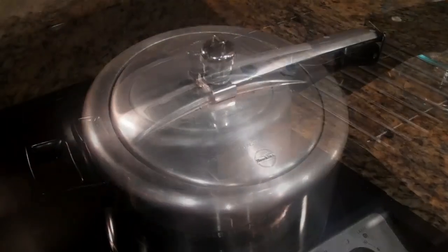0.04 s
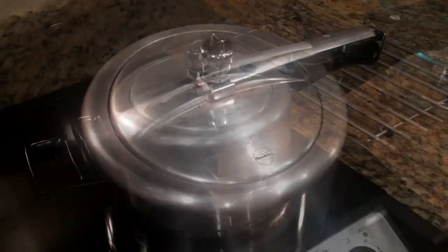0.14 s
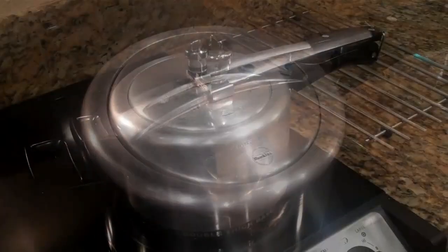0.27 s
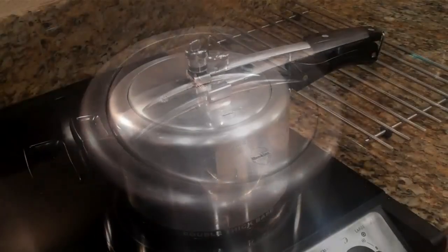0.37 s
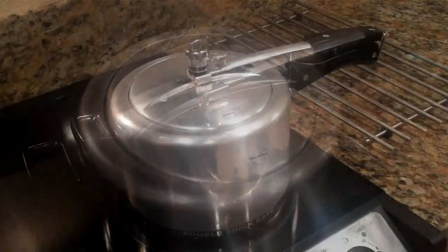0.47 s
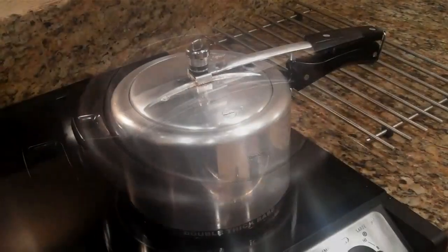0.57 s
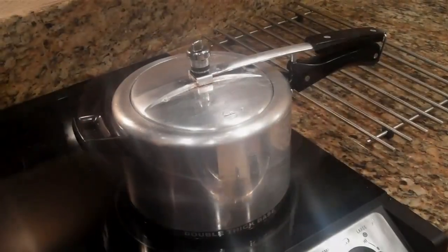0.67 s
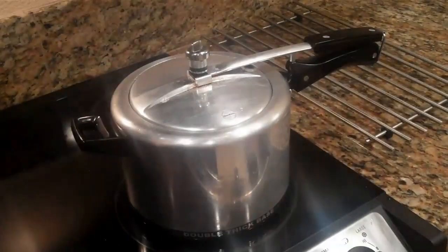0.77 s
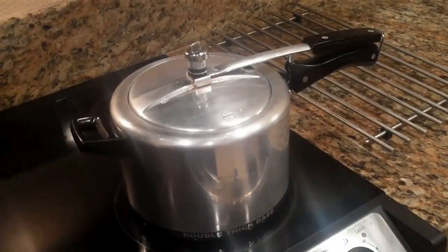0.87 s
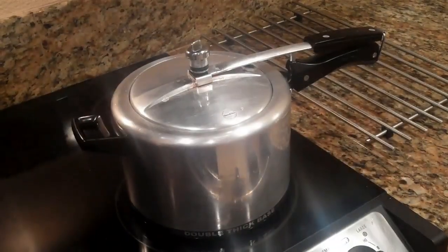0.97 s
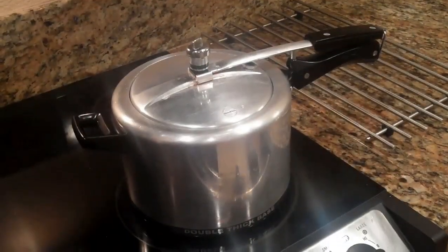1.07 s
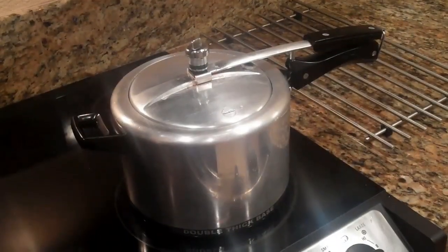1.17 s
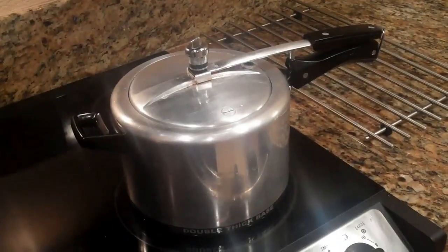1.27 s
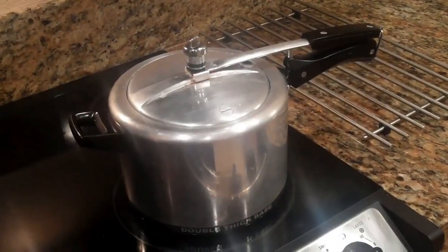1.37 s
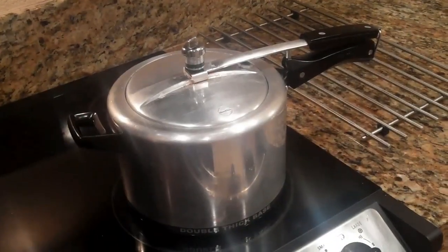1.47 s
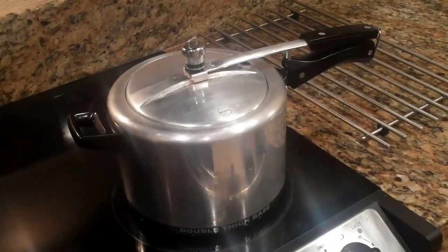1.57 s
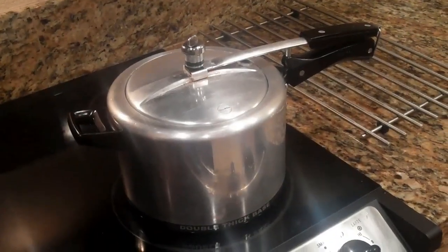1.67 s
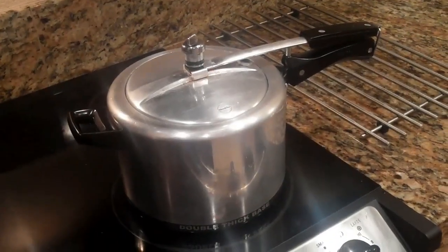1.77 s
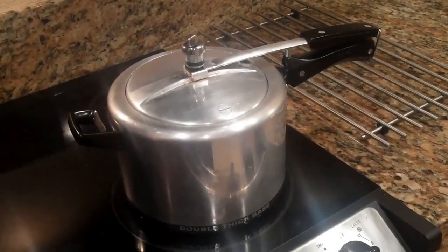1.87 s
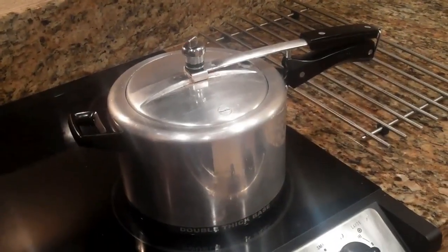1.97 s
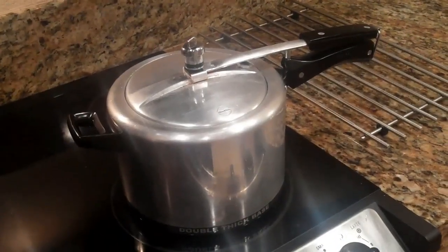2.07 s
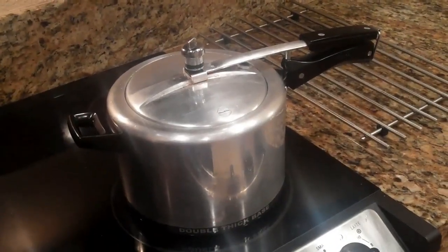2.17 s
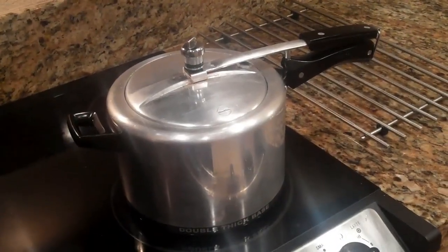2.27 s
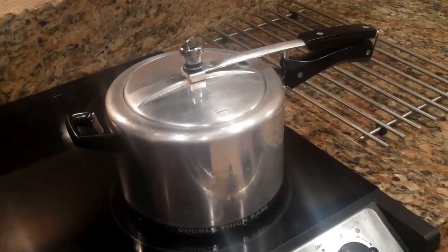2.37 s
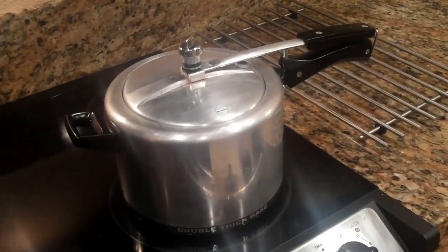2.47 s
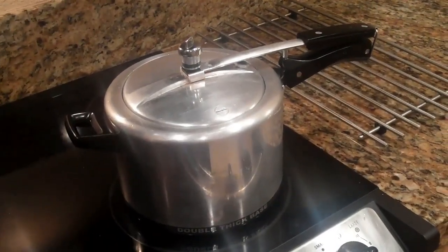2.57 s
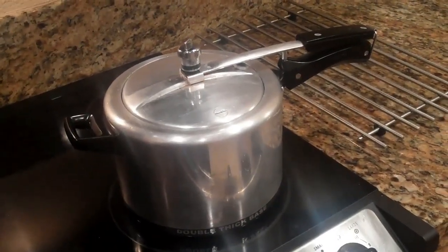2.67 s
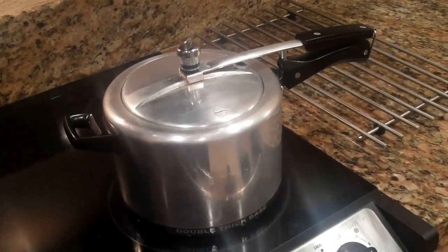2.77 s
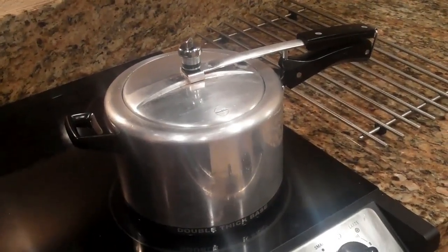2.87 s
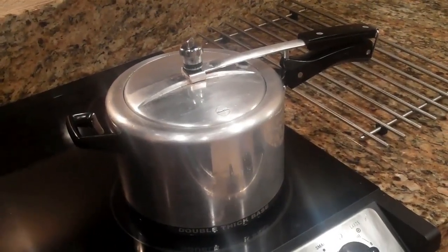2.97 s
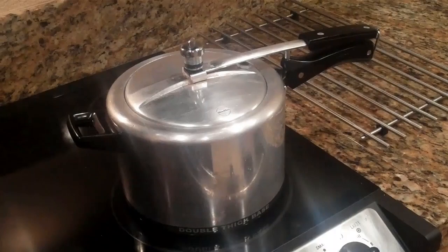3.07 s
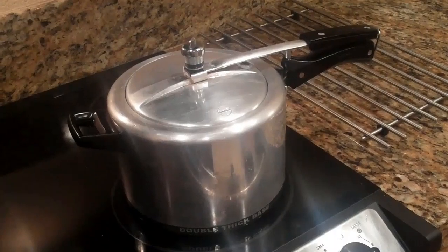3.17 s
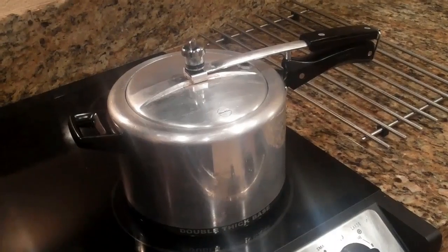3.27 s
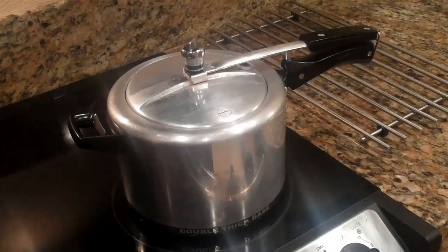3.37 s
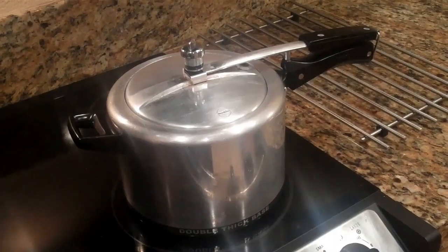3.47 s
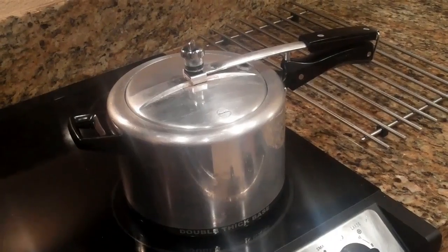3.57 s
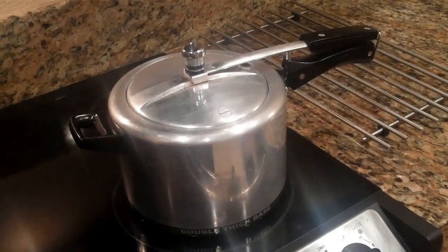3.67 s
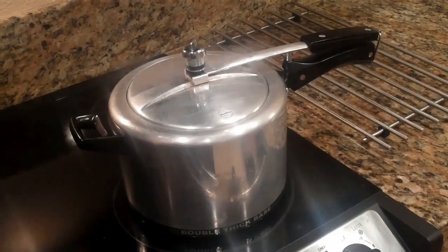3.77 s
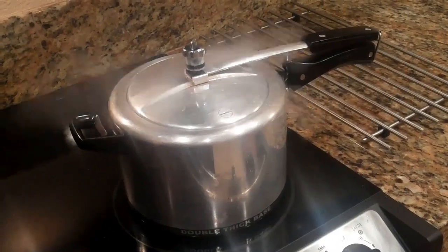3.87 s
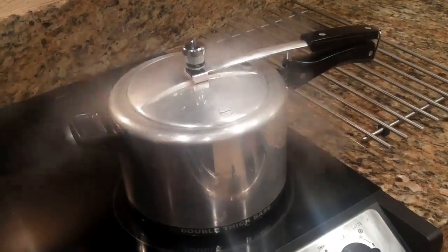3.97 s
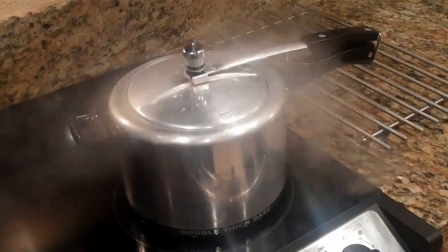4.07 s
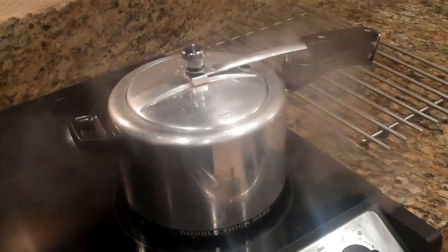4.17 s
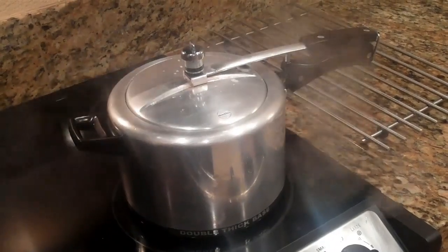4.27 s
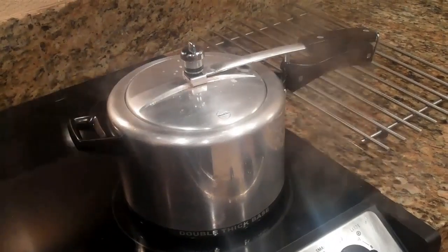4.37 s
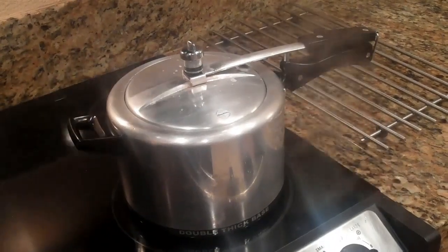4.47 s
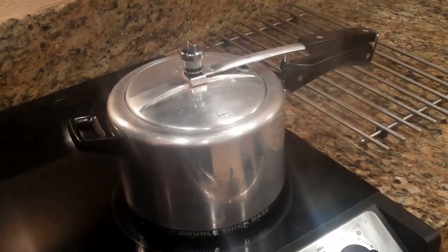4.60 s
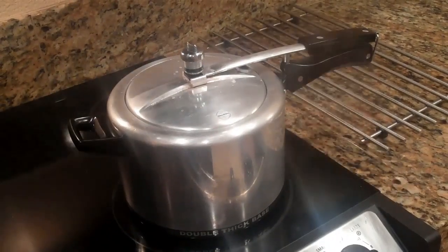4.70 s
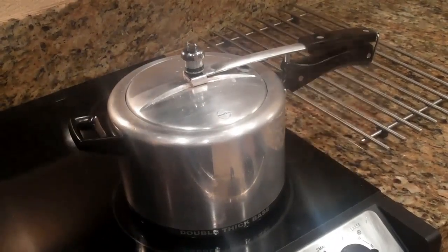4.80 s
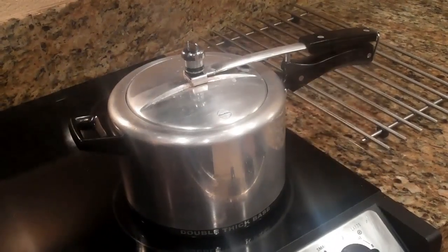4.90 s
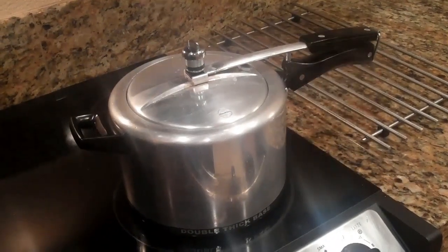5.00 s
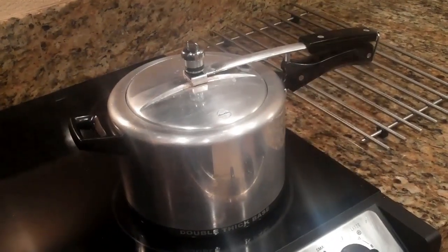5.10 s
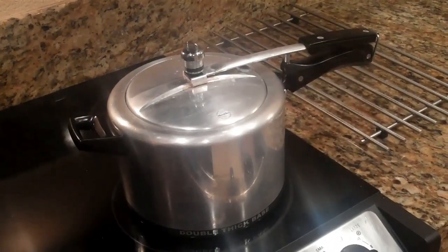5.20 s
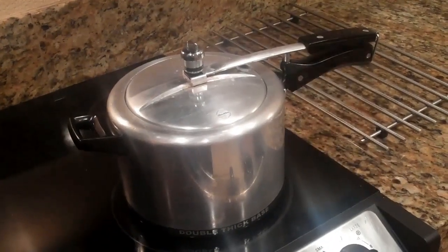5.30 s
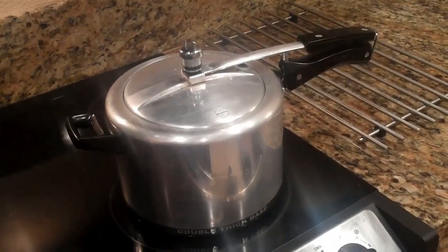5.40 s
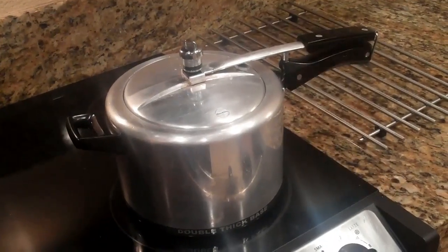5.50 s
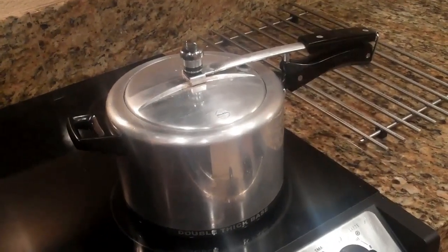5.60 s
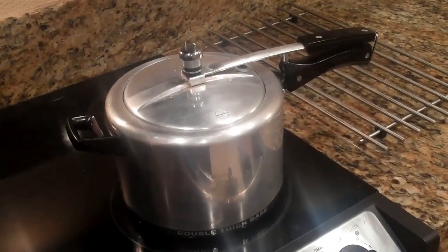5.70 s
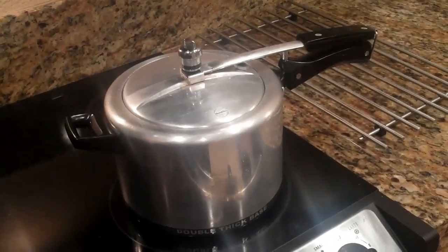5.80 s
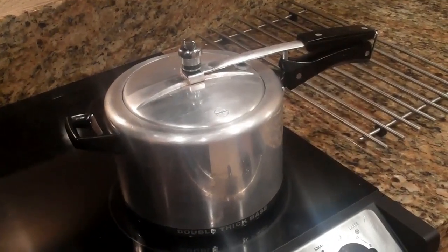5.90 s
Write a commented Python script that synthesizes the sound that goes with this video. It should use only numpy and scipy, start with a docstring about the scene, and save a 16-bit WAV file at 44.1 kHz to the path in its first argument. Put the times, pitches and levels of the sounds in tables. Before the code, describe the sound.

In a lightly reverberant kitchen, a close stereo microphone with automatic level control hears a stovetop pressure cooker. The sound fades in over the first 0.9 seconds: faint electrical hum, soft simmering fizz and bright, airy puffs of steam. A dull low thud falls at 0.3. The puffs come roughly seven per second, strong and weak alternating, and from 1.0 the rocking weight adds faint dull clinks about every 0.3 seconds. Around 3.1 the puffs crowd together. At 3.75 the hiss swells fast into a full, roaring steam blast with a brief deep surge near 3.87, lasting until 4.15, when it stops abruptly. The weight drops with a metallic clank at 4.17 and bounces twice, leaving a short room tail. The background, ducked by the blast, partly recovers to quiet fizz and hum. Small sharp ticks sound between 5.2 and 5.9, with a soft, hollow knock at 5.7.

```python
"""A pressure cooker on a kitchen stove, heard by a stereo microphone with automatic gain control.
The sound fades in on an appliance's hum (sines), a simmering pot and puffs of steam (shaped noise); the room
answers the cooker with decaying noise. A soft thud comes early, then the rocking weight clinks (damped tones).
The weight lifts for one roaring blast, the gain ducks, holds and recovers, and the weight drops shut and bounces.
Ticks and a soft knock close the scene. Table levels stand ahead of the gain control and the overall gain."""
import sys
import numpy as np
from scipy import signal
from scipy.fft import rfft, irfft, next_fast_len
from scipy.io import wavfile
from scipy.ndimage import uniform_filter1d, minimum_filter1d, map_coordinates

SR = 44100
rng = np.random.default_rng(int(sys.argv[2]) if len(sys.argv) > 2 else 0)


def to_wav(sig):
    """Store sig (one row per channel, or 1-D mono) as 16-bit WAV at the path in sys.argv[1].

    Samples outside -1..1 are clipped; the rate is SR.
    """
    pcm = np.clip(np.atleast_2d(sig), -1, 1) * 32767
    pcm = np.round(pcm).astype(np.int16)
    wavfile.write(sys.argv[1], SR, pcm.T)  # frames by channels


N = 262218


def amp(db):
    """Gain of a level in dB."""
    return 10 ** (np.asarray(db) / 20)


def unit(x):
    """x at rms 1."""
    return x / np.sqrt(np.mean(x ** 2) + 1e-20)


def along(points, hz):
    """Reads (frequency, value) points at hz, on a log frequency axis."""
    point_hz, values = np.transpose(points)
    return np.interp(np.log(hz + 1), np.log(point_hz + 1), values)


def curves(rows):
    """One value per sample for each column after the time."""
    times, *columns = np.transpose(rows)
    return [np.interp(np.arange(N) / SR, times, column) for column in columns]


def wobble(rate):
    """A smooth random curve with rate knots a second."""
    knots = rng.standard_normal(int(N * rate / SR) + 4)
    return map_coordinates(knots, [np.arange(N) * rate / SR])


def filtered(x, response):
    """x times a complex response of frequency."""
    size = next_fast_len(N + SR // 2)
    return irfft(rfft(x, size) * response(np.fft.rfftfreq(size, 1 / SR)), size)[..., :N]


# How alike noise is at the two microphone ports: pitch_hz, likeness [1 = same], before a sound's share
PORT_LIKENESS = [(60, .4), (300, .6), (1000, .85), (2400, .97), (4300, .85), (5900, .45), (7700, .25),
                 (9300, .62), (10700, .77), (12100, .68), (14100, .3)]
# Phase by which the left port leads: pitch_hz, lead_rad
LEFT_LEAD = [(60, 0), (4500, .2), (5900, 1), (6600, 1.7), (8000, .9), (9300, 1), (11400, 2.2), (14000, 2.5)]
# Left port's level above the right: pitch_hz, difference_db
LEFT_ABOVE_RIGHT = [(60, 0), (5200, .8), (6500, -3.5), (8200, -2), (9700, -4), (11400, -1), (12700, 2),
                    (14100, 3)]


def rush(gain, patchy_db, share=1):
    """Noise with random patches in time and frequency at two microphone ports; their mean has rms 1."""
    spectrum = signal.stft(rng.standard_normal((2, N + 512)), nperseg=512)[2]
    field = rng.standard_normal(spectrum.shape[1:])
    field = uniform_filter1d(uniform_filter1d(field, 5, 0), 6, 1)
    pair = signal.istft(spectrum * amp(patchy_db * unit(field)), nperseg=512)[1][:, :N]

    def mid_side(hz):
        turn = np.arccos(np.clip(share * along(PORT_LIKENESS, hz), -1, 1)) / 2
        return gain(hz) * [np.cos(turn), np.sin(turn)]

    def ports(hz):
        left = amp(along(LEFT_ABOVE_RIGHT, hz) / 2) * np.exp(.5j * along(LEFT_LEAD, hz))
        return np.array([left, 1 / left])

    mid, side = filtered(pair, mid_side)
    both = filtered(np.array([mid + side, mid - side]), ports)
    return both / np.sqrt(np.mean(both.mean(0) ** 2))


def blurred(hz, t60, blur, attack):
    """A quarter-second damped tone whose phase wanders; t60 and attack in s."""
    t = np.arange(SR // 4) / SR
    wander = blur * np.cumsum(rng.standard_normal(len(t))) / np.sqrt(SR / 100)
    tone = np.sin(2 * np.pi * hz * t + wander)
    return amp(-60 * t / t60) * tone * (1 - np.exp(-t / attack))


def add(track, s, sound):
    """Mixes a sound into the track from time s."""
    track[round(s * SR):][:len(sound)] += sound


# Appliance hum on the mains multiples: pitch_hz, level_db (0.5 dB lower at the left port, 0.5 dB higher at the
# right)
HUM_TONES = [(120, -73.5), (240, -71), (360, -53.5), (480, -73.5), (600, -73), (720, -72.5), (840, -72.5),
             (960, -69.5), (1080, -76.5), (1200, -82)]


def hum():
    """Slightly unsteady sines on the mains multiples reach both ports in the same phase, 1 dB stronger at the
    right."""
    t = np.arange(N) / SR
    tones = 0
    for hz, db in HUM_TONES:
        tones = tones + amp(db + .4 * wobble(12)) * np.sin(2 * np.pi * (hz * t + rng.random()))
    return tones * amp([[-.5], [.5]])


# Pot and kitchen air: pitch_hz, level_db [relative, per Hz]
SIMMER_SPECTRUM = [(20, -4.5), (40, 3), (70, -3.5), (130, -3.5), (250, -2), (450, -6), (750, -2),
                   (1300, -3.5), (2000, -3), (2800, -0.5), (4700, -0.5), (7000, -2.5), (10700, -6.5),
                   (12500, -9.5), (14400, -24)]


def simmer():
    """The soft fizz of the pot is noise whose level flickers slowly and quickly."""
    flicker_db = .6 * wobble(6) + .6 * wobble(25) + wobble(300)
    return amp(-51.0 + flicker_db) * rush(lambda hz: amp(along(SIMMER_SPECTRUM, hz)), patchy_db=1.5, share=.7)


# Puffs through the rocking weight: top_s, level_db, length_s [between the points at 1/e of top power]
STEAM_PUFFS = [(0.053, -43.5, 0.051), (0.203, -36, 0.073), (0.33, -37.5, 0.061), (0.475, -35, 0.083),
               (0.617, -39, 0.061), (0.779, -31.5, 0.088), (0.915, -38.0, 0.066), (1.082, -31.5, 0.093),
               (1.206, -38.0, 0.063), (1.367, -31.5, 0.082), (1.487, -42.5, 0.074), (1.655, -32.0, 0.092),
               (1.764, -45.5, 0.052), (1.952, -30.5, 0.11), (2.083, -42.0, 0.073), (2.238, -33.0, 0.07),
               (2.353, -43, 0.07), (2.536, -31.0, 0.1), (2.664, -40.5, 0.077), (2.825, -31.5, 0.082),
               (2.952, -39, 0.066), (3.098, -31.5, 0.033), (3.171, -30, 0.14), (3.317, -36, 0.04),
               (3.391, -31.5, 0.074), (3.505, -40, 0.062), (3.614, -36, 0.051), (3.698, -28.5, 0.093)]
# Steam squeezing past the weight: pitch_hz, level_db [relative, per Hz]
SQUEEZED_JET = [(290, -56.5), (500, -30.5), (1070, -18), (1500, -18), (1750, -14.5), (2250, -15.5),
                (2670, -6.5), (5240, -2), (6290, -1), (6850, -0.5), (8340, -5.5), (10900, -1.5),
                (12500, -5), (14400, -17.5)]
# Steam from the open vent: pitch_hz, level_db [relative, per Hz]
OPEN_JET = [(500, -37.5), (1000, -21), (1800, -13), (2250, -13), (2700, -8), (3800, -4), (4500, -4.5),
            (6000, -2), (7800, -4.5), (9300, -3.5), (11000, -3.5), (12700, -10), (14400, -18)]
# Air columns of the vent: pitch_hz, width_hz, boost_db [the added gain is half of this in amplitude]
AIR_COLUMNS = [(1730, 53, 3.5), (2660, 67, -12), (3630, 200, 0.5), (4240, 720, -2), (6840, 41, -7.5),
               (7180, 120, 0.5), (10100, 5900, -13)]
# Steam flow once the weight lifts off: time_s, level_db [as hiss]
LIFTED_FLOW = [(3.69, -49), (3.75, -30.5), (3.79, -26), (3.82, -17.5), (3.86, -10.5), (3.92, -7),
               (4.0, -7.5), (4.09, -7), (4.147, -12)]
RISE_SHARE = 0.63  # part of a puff's length spent swelling
BLUNTNESS = 2.35  # power of a puff's bell curve, 2 = round top
CLEAR_S, CLEARING_S = 3.76, 0.073  # the weight starts to clear the vent; time it takes
SHUT_S, DYING_DB_PER_S = 4.149, 244  # the weight drops; how fast the hiss then falls


def steam():
    """Turbulent jet noise through the vent's air columns; each puff swells and dies as a lopsided bell."""
    t = np.arange(N) / SR
    puff_power = 0
    for top_s, db, length in STEAM_PUFFS:
        side_s = length * np.where(t < top_s, RISE_SHARE, 1 - RISE_SHARE)
        puff_power = puff_power + amp(db) ** 2 * np.exp(-np.abs((t - top_s) / side_s) ** BLUNTNESS)

    def columns(hz):
        peaks = sum(amp(db) / (1 + (2 * (hz - center) / width) ** 2) for center, width, db in AIR_COLUMNS)
        return 1 + peaks / 2

    lifted_db = curves(LIFTED_FLOW)[0] - DYING_DB_PER_S * np.maximum(t - SHUT_S, 0)
    lifted = amp(lifted_db) * (t > LIFTED_FLOW[0][0])
    # share of the steam that no longer squeezes past the weight
    clear = np.clip((t - CLEAR_S) / CLEARING_S, 0, 1)
    squeezed = np.sqrt(puff_power + (1 - clear) * lifted ** 2)
    puffs = squeezed * rush(lambda hz: amp(along(SQUEEZED_JET, hz)) * columns(hz), patchy_db=1.5)
    open_hiss = rush(lambda hz: amp(along(OPEN_JET, hz)) * columns(hz), patchy_db=2.0, share=0.84)
    blast = np.sqrt(clear) * lifted * open_hiss
    spit = amp(0.62 * wobble(45) + 0.37 * wobble(400))  # droplets make the jet spit
    return spit * (puffs + blast)


# How long the room answers: pitch_hz, t60_s
ROOM_DECAY = [(200, 0.98), (2000, 0.78), (10000, 0.44)]


def kitchen(x):
    """Each frequency of the room's answer dies at its own speed."""
    hz, t, noise = signal.stft(rng.standard_normal((2, SR)), SR, nperseg=256)
    decay = amp(-60 * t / along(ROOM_DECAY, hz)[:, None])
    tail = signal.istft(noise * decay, SR, nperseg=256)[1]
    return signal.fftconvolve(x, tail / np.linalg.norm(tail[0]), axes=1)[:, :N]


THUD_S, THUD_DB, THUD_HZ, THUD_T60_S = 0.31, -51, 176, .25


def thud(track):
    """A soft low thud nearby, one slightly blurred damped tone."""
    add(track, THUD_S, amp(THUD_DB) * blurred(THUD_HZ, THUD_T60_S, blur=.2, attack=.0043))


# The weight touches its seat, at last falling shut and bouncing: start_s, level_db
SEAT_TOUCHES = [(1.006, -51), (1.291, -47.5), (1.579, -53), (1.865, -49), (2.154, -46), (2.443, -46),
                (2.609, -52), (2.733, -45), (3.03, -46), (3.318, -46.5), (3.606, -47), (4.174, -25.5),
                (4.226, -32), (4.262, -43)]
# Ringing of the damped lid: pitch_hz, level_db [varies with every touch], t60_s
LID_MODES = [(800, -3, .07), (900, -8, .08), (1017, 0, .11), (1290, -5, .06), (1755, -7, .06)]


def clinks(track):
    """Every touch of the weight rings the damped lid at new strengths over a dull rattle."""
    for s, db in SEAT_TOUCHES:
        ring = 0
        for hz, level, t60 in LID_MODES:
            ring = ring + amp(level + rng.normal(0, 1.7)) * blurred(hz, t60, blur=0.99, attack=0.001)
        rattle = 1.4 * blurred(1250, .07, blur=4.5, attack=.004)
        add(track, s, amp(db) * (ring + rattle))


# Roar of the open vent: pitch_hz, level_db [relative, per Hz]
ROAR_SPECTRUM = [(60, -21), (150, -11.5), (300, -3), (500, -4), (900, -1), (1500, -3), (2500, -0.5),
                 (4000, -9.5), (7000, -36)]
FULL_FLOW_DB, ROAR_DB, ROAR_GROWS = -7, -14.5, 1  # full flow; the roar there; its dB per dB of flow
ROAR_S, ROAR_LAG_DB, ROAR_BUILD_S = 3.807, -12.5, .12  # it breaks out this much weaker and builds up
ROAR_CUT_DB_PER_S = 3498.5  # steepness of the roar's start and stop
SURGE_S, SURGE_DB, SURGE_RISE_S, SURGE_FALL_S = 3.875, -31, .02, .09  # the deepest part of the roar


def roar():
    """Lumpy noise breaks out of the open vent, builds with the flow, surges deep once and stops dead."""
    t = np.arange(N) / SR
    cut_db = -ROAR_CUT_DB_PER_S * (np.maximum(t - SHUT_S, 0) + np.maximum(ROAR_S - t, 0))
    build_db = ROAR_LAG_DB * np.clip(1 - (t - ROAR_S) / ROAR_BUILD_S, 0, 1)
    flow_db = ROAR_GROWS * (curves(LIFTED_FLOW)[0] - FULL_FLOW_DB)
    lumps = amp(ROAR_DB + flow_db + build_db + cut_db + 1.2 * wobble(60))
    body = lumps * rush(lambda hz: amp(along(ROAR_SPECTRUM, hz)), patchy_db=0.0, share=0.44)
    side_s = np.where(t < SURGE_S, SURGE_RISE_S, SURGE_FALL_S)
    surge = amp(SURGE_DB + cut_db) * np.exp(-np.abs(t - SURGE_S) / side_s)
    bass = [(15, -3.5), (30, 0.0), (100, -8.0), (250, -6.5), (500, -33)]  # pitch_hz, level_db
    deep = surge * rush(lambda hz: amp(along(bass, hz)), patchy_db=0.5, share=.8)
    # one brief 27 Hz push, equal at both ports
    push = amp(-35.5) * np.sin(2 * np.pi * 27 * (t - 3.83)) * np.exp(-((t - 3.865) / .022) ** 2)
    return (body + deep) * amp([[1.5], [-1.5]]) + push  # noise 3 dB stronger on the left


# Sharp ticks in the settling pot: start_s, level_db, t60_s
POT_TICKS = [(5.178, -42, .01), (5.496, -39, .012), (5.581, -38.5, .025), (5.675, -31, .008),
             (5.93, -43, .015)]
TICK_HZ = 4600


def ticks(track):
    """The settling pot ticks: short damped tones, more blurred the shorter they ring."""
    for s, db, t60 in POT_TICKS:
        add(track, s, amp(db) * blurred(TICK_HZ, t60, blur=.1 / t60, attack=.0002))


# Ringing of a soft knock: pitch_hz, level_db [added to the knock's level], t60_s
KNOCK_MODES = [(1078, 1.5, 0.12), (1360, -1, 0.11), (1960, -14, .07), (2280, -6, .06)]
KNOCK_S, KNOCK_DB = 5.694, -41


def knock(track):
    """A soft pitched knock nearby, a few damped tones, blurred more towards the top."""
    for hz, db, t60 in KNOCK_MODES:
        add(track, KNOCK_S, amp(KNOCK_DB + db) * blurred(hz, t60, blur=hz / 500, attack=.005))


def struck_parts():
    """Thud, clinks, ticks and knock share one low cut: small parts radiate no bass."""
    track = np.zeros(N + SR)
    for strike in (thud, clinks, ticks, knock):
        strike(track)
    return filtered(track[:N], lambda hz: 1 - 1 / (1 + (hz / 120) ** 4))


def scene():
    """Steam and struck parts sound in the room; the bass of the roar is too local to be answered."""
    background = hum() + simmer()
    cooker, open_vent = steam() + struck_parts(), roar()
    answered_roar = filtered(open_vent, lambda hz: 1 / (1 + (900 / (hz + 1)) ** 4))
    radiated = cooker + amp(-9.5) * answered_roar
    return cooker + open_vent + amp(-10) * kitchen(radiated) + background


def gain_control(x, limit_db, hold, attack, release):
    """Gain in dB that follows the excess over the limit, waits for hold seconds and lets go."""
    step = SR // 200
    power = uniform_filter1d(np.mean(x ** 2, 0), SR // 50)[::step]
    need = np.minimum(limit_db - 10 * np.log10(np.abs(power) + 1e-12), 0)
    size = round(hold * SR / step)
    # each dip is kept for the hold time
    held = minimum_filter1d(np.pad(need, (size, size)), size)[size - (size - 1) // 2:][:len(need)]
    gain = np.zeros(len(need))
    for i in range(1, len(need)):
        wait = attack if held[i] < gain[i - 1] else release
        gain[i] = gain[i - 1] + (held[i] - gain[i - 1]) * step / SR / max(wait, step / SR)
    return np.interp(np.arange(N), np.arange(len(need)) * step, gain)


FADE_DB, FADE_S, RECORD_DB = -7, 0.86, 1.5  # level at the start, time to full level, overall gain
TOP_HZ = 14280  # the band limit falls steeply around here


def record(dry):
    """A quick and a lasting stage of gain control, the fade, the circuit's offset and drift, the band limit."""
    quick_db = gain_control(dry, limit_db=-26.5, hold=0.56, attack=0.081, release=.075)
    lasting_db = gain_control(dry, limit_db=-29.5, hold=0.66, attack=0.077, release=20)
    fade_db = FADE_DB * np.clip(1 - np.arange(N) / SR / FADE_S, 0, 1)
    level = amp(0.75 * quick_db + 0.28 * lasting_db + RECORD_DB + fade_db) * dry
    rumble = [(3, 2.5), (12, -9.5), (30, -15), (60, -29.0), (120, -91)]  # pitch_hz, level_db
    drift = amp(-76.5) * rush(lambda hz: amp(along(rumble, hz)), patchy_db=0.0)
    offset = -amp(-68.5)
    return filtered(level + drift + offset, lambda hz: amp(-np.clip(hz - TOP_HZ + 100, 0, 360) / 3))


dry = scene()
out = record(dry)
to_wav(out)
```